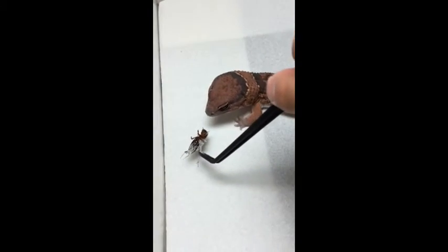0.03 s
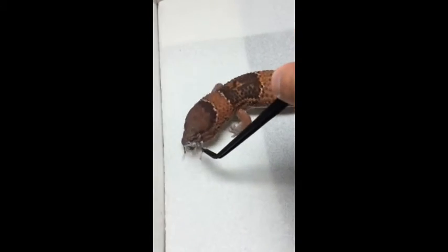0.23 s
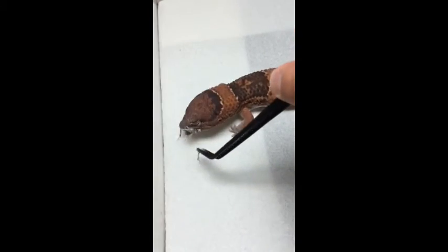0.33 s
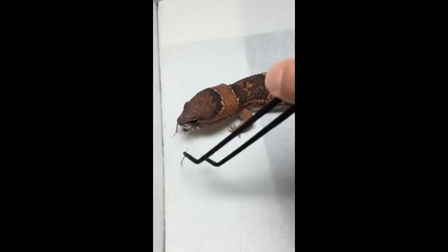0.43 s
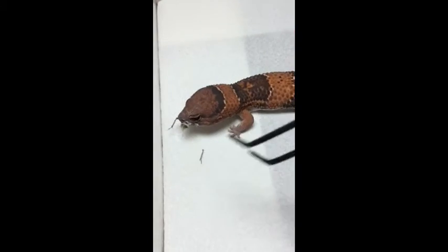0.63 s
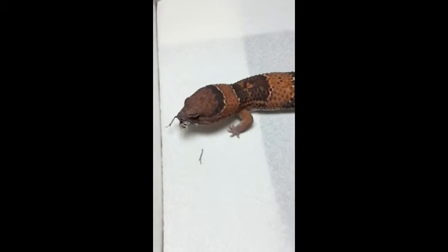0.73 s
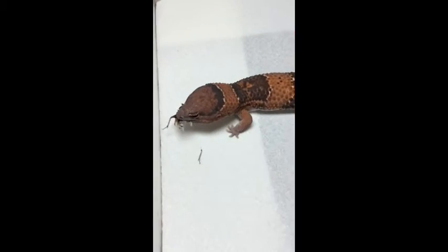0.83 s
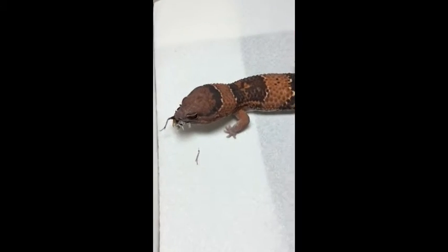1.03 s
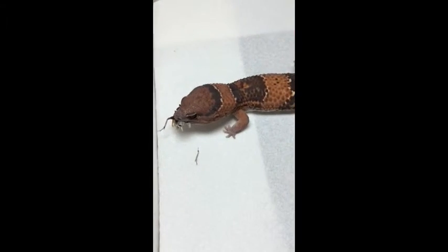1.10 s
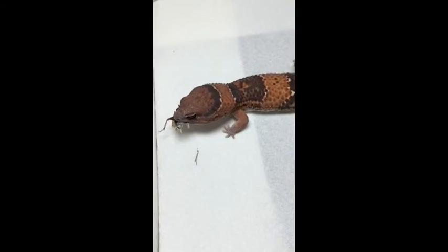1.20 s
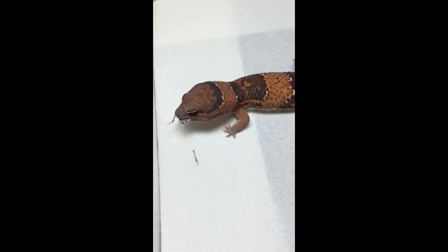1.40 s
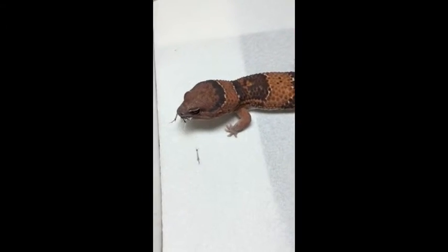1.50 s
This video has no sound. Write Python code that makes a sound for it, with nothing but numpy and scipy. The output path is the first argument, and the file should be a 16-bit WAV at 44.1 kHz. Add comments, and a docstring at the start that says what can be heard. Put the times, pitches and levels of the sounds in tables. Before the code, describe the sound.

A gecko crunches an insect close by. At about 0.2 seconds it lunges with a brief scuff on paper and a soft, hollow thump. Small dry snaps and crinkles of shell follow, with harder bites around 0.65 seconds and from 0.9 to 1.05. The chewing then thins to faint ticks, with one more small crackle near 1.4 seconds. A low ventilation hum fills the quiet room throughout.

```python
"""A ventilation-like hum fills a quiet room. A gecko lunges at an insect held in tweezers: friction over
paper makes a scuff, and the impact of its body excites the damped modes of the enclosure floor.
Then it chews. Each fracture of the shell is a short dry snap that rings two small resonances around
the jaws; hard bites crush the body, and softer crinkling and faint ticks come between them."""
import sys
import numpy as np
from scipy import signal
from scipy.fft import rfft, irfft
from scipy.io import wavfile
from scipy.ndimage import uniform_filter1d

SR = 44100
rng = np.random.default_rng(int(sys.argv[2]) if len(sys.argv) > 2 else 0)


def dump_mix(stems):
    """Bounce the given channels to the path in sys.argv[1] as a 16-bit WAV at rate SR."""
    frames = np.atleast_2d(stems).T  # one column per channel
    limited = np.clip(frames, -1, 1)  # hard clip at full scale
    pcm = np.round(limited * 32767).astype(np.int16)
    wavfile.write(sys.argv[1], SR, pcm)


N = 68355

# Shell fractures. Each row: start in seconds, snap level in dB, snap centre in Hz, splinters in dB
# relative to the snap, high ring level in dB, low ring level in dB, low ring frequency in Hz.
SHELL_CRACKS = [(0.282, -56, 9200, -5, -52, -81, 2450), (0.3248, -65, 8800, 1, -65, -61, 2050),
                (0.477, -54.5, 11600, -17, -76, -80.5, 2240), (0.5039, -65, 12500, -2, -82, -84, 2210),
                (0.516, -64, 11700, -10, -66, -67, 2300), (0.5205, -41, 9800, -26, -62, -60.5, 2120),
                (0.5506, -57.5, 11000, -5, -75, -78, 2400), (0.5523, -54.5, 13300, -3, -83, -69, 1800),
                (0.5641, -61.5, 10400, -10, -84, -65, 1840), (0.573, -62, 11500, 1, -61.5, -60, 2040),
                (0.5794, -59, 11800, -5, -71, -69, 2360), (0.6325, -57.5, 11300, -8, -60, -64.5, 2130),
                (0.6512, -43, 11800, -16, -66, -47.5, 1920), (0.6545, -50, 9100, 4, -47, -55.5, 2240),
                (0.661, -54.5, 10800, -3, -56, -64, 2820), (0.6662, -56, 8700, -6, -54, -53, 2780),
                (0.778, -64, 12700, -10, -92, -80, 2140), (0.7976, -59.5, 10100, -8, -93.5, -73.5, 1800),
                (0.8372, -56, 11600, -2.5, -85, -69, 1770), (0.8669, -52.5, 11400, -4.5, -78, -61, 2260),
                (0.8874, -59.5, 9500, -4.5, -74.5, -72, 2520), (0.8905, -54, 10500, -1, -72, -63.5, 2640),
                (0.9254, -42.5, 11700, 16, -46, -47.5, 2640), (0.9323, -50, 10100, 1, -53, -56, 2560),
                (0.9374, -58, 11300, -4, -62, -58, 2160), (0.966, -50.5, 11000, -6, -52.5, -49, 2572),
                (0.981, -67, 9500, -8, -56, -77, 2580), (0.994, -62, 11400, -5, -61, -67, 2050),
                (1.0038, -41.5, 11300, 6, -56, -52, 2030), (1.0108, -46, 13000, -5, -55, -58, 2020),
                (1.0143, -47, 9000, 1, -45.5, -53, 2160), (1.0253, -58, 11200, 1, -60.5, -67, 2180),
                (1.0317, -58.5, 10300, -1, -52.5, -62.5, 2020), (1.0396, -43, 9900, -6.5, -39, -45.5, 2040),
                (1.0495, -46.5, 9300, -22, -55, -66, 2550), (1.054, -55, 10000, -4, -59, -65, 2030),
                (1.1539, -64, 9200, -8, -72, -70.5, 1830), (1.3044, -59, 11200, 3, -80, -70, 2380),
                (1.4044, -77, 5500, 0.5, -72, -61.5, 2930), (1.4202, -53, 7640, 16, -64, -62.5, 2450)]
# Peaks and dips of every snap. Each row: centre in Hz, width in Hz, gain in dB.
SNAP_BANDS = [(4480, 700, 2.5), (7800, 670, -5.5), (8730, 520, 2.5)]
# Enclosure modes. Each row: frequency in Hz, level in dB relative to the low ring, decay in seconds.
ENCLOSURE_MODES = [(1048, -17.5, 0.0046), (2615, -5, 0.006), (2880, -17, 0.007), (4550, -9, 0.0015)]
# The insect's body giving way. Each row: start in seconds, level in dB, decay in seconds.
HARD_BITES = [(.5725, -54, 0.0042), (.651, -42, 0.0017), (.6545, -40.5, 0.00495), (0.666, -49, 0.0044),
              (.9257, -48, 0.0036), (.9657, -42, 0.0038), (1.0156, -50, 0.0069), (1.0396, -60, 0.0039)]
# Wings and legs crumpling. Each row: start in seconds, length in seconds, level in dB.
CRINKLE_SWELLS = [(0.462, 0.066, -67.5), (.535, 0.072, -67.5), (0.616, 0.072, -60.5), (0.877, 0.034, -57),
                  (0.928, 0.14, -60.5), (1.367, 0.033, -65.5), (1.402, 0.018, -55), (1.408, 0.043, -64)]
# The course of the scuff. Each row: time in seconds, level in dB.
SCUFF_ENVELOPE = [(.14, -99), (.168, -66), (.195, -71), (0.218, -59), (0.224, -40), (0.234, -40),
                  (0.24, -43), (0.257, -33.5), (0.272, -47), (.3, -53), (.32, -62.5), (.365, -66),
                  (.388, -60), (0.429, -82)]
# The gecko landing, then shifting its weight. Each row: start in seconds, level in dB.
FLOOR_BLOWS = [(.249, -40), (0.2547, -34), (0.2589, -25.5), (.306, -49), (.381, -47), (1.276, -50.5)]
# Floor modes. Each row: frequency in Hz, level in dB relative to the blow, decay in seconds.
FLOOR_RESONANCES = [(55, -27.5, 0.01), (103.5, -12, .017), (138, 6, 0.014), (226, -19.5, 0.007),
                    (404, -13.5, 0.018)]
# Knocks of the strike and a bite. Each row: start in seconds, frequency in Hz, level in dB, decay in seconds.
HOLLOW_KNOCKS = [(.223, 437, -41.5, 0.012), (.2325, 1087, -34.5, 0.0052), (0.2536, 455, -30.5, 0.0085),
                 (.254, 733, -41.5, 0.0065), (.263, 1020, -48, 0.011), (.655, 990, -53, 0.013)]
# Fan and mains tones. Each row: frequency in Hz, level in dB.
HUM_LINES = [(100, -59), (200, -67), (316, -68), (416, -69.5), (776, -90.5), (905, -77), (1016, -80.5)]
# Spectra of the four noises. Each row: frequency in Hz, relative spectral density in dB.
CRUSH_SPECTRUM = [(500, -43), (1000, 7), (1400, -12), (1900, 5), (3500, 3.5), (4700, -14), (5500, -22),
                  (9000, -3.5)]
CRINKLE_SPECTRUM = [(1200, -14), (2600, 5), (3700, -7), (5700, -5), (6400, 0.5), (7200, -1.5), (10000, -6),
                    (15000, 0)]
SCUFF_SPECTRUM = [(50, -35), (150, 13), (300, 4), (430, 10.5), (560, -2), (760, 3), (880, -7), (1050, 8),
                  (1250, -1), (1650, -0.5), (2500, 0), (3500, -4), (6300, -2.5), (11000, -3), (15000, -3)]
AIR_SPECTRUM = [(20, -32), (35, -7), (52, -3.5), (72, -11), (100, 0.5), (140, -0.5), (200, -3), (260, -7),
                (330, -5), (430, -9.5), (520, -17), (750, -16.5), (950, -20), (1300, -23.5), (1750, -20),
                (2300, -32.5), (3300, -36.5), (6500, -38.5), (9000, -42), (15000, -41.5)]


def cracks():
    """Impulse excitation: each snap rings two resonances around the jaws and, faintly, the enclosure."""
    out, t = np.zeros(N), np.arange(SR // 20) / SR
    walls = sum(at_level(mode(t, hz, decay, rise_s=.0005), db) for hz, db, decay in ENCLOSURE_MODES)
    for start, snap_db, snap_hz, splinter_db, high_db, low_db, low_hz in SHELL_CRACKS:
        fracture = at_level(snap(t, snap_hz, splinter_db), snap_db)
        high_hz = 6350 * (1 + .012 * rng.standard_normal())
        high = at_level(jaw_ring(t, high_hz, width_hz=900), high_db)
        low = at_level(jaw_ring(t, low_hz, width_hz=970), low_db)
        add(out, start, fracture + high + low + undb(low_db) * walls)
    return out


def snap(t, centre_hz, splinter_db):
    """Brittle fracture releases stress as a bright burst, trailed by splinters and near echoes."""
    rise_s, snap_s, splinter_s, echo_s = .00012, .0006, .0017, .005
    splinters = undb(splinter_db) * np.exp(-t / splinter_s)
    echoes = undb(-21) * np.exp(-t / echo_s)
    envelope = (np.exp(-t / snap_s) + splinters + echoes) * (1 - np.exp(-t / rise_s))
    burst = band(rng.standard_normal(len(t)) * envelope, centre_hz, width_hz=3700)
    burst = signal.sosfilt(signal.butter(4, 2930, "high", fs=SR, output="sos"), burst)
    for hz, width_hz, db in SNAP_BANDS:
        burst = burst + (undb(db) - 1) * band(burst, hz, width_hz)
    return burst


def jaw_ring(t, hz, width_hz, decay_s=.002, rise_s=.0005, roughness=.6):
    """A heavily damped resonance: a sine, roughened by narrow-band noise, dies within milliseconds."""
    noise = band(rng.standard_normal(len(t)), hz, width_hz)
    tone = np.sin(2 * np.pi * hz * t) + roughness * unit(band(noise, hz, width_hz))
    return tone * np.exp(-t / decay_s) * (1 - np.exp(-t / rise_s))


def crush(t):
    """Collapse under load: dense fractures merge into fuller, lower bursts that decay exponentially."""
    out = np.zeros(N)
    for start, db, decay in HARD_BITES:
        fractures = colour(grains(per_s=8000, spread_db=2), CRUSH_SPECTRUM)
        add(out, start, undb(db) * np.exp(-t / decay) * fractures)
    return out


def crinkles(t):
    """Crumpling: tiny fractures add up to a soft swell each time the jaws squeeze."""
    swell = np.zeros(N)
    for start, length, db in CRINKLE_SWELLS:
        progress = np.clip((t - start) / length, 0, 1)
        swell += undb(db) * np.sqrt(np.abs(np.sin(np.pi * progress)))
    return swell * colour(grains(per_s=2600, spread_db=3.5), CRINKLE_SPECTRUM)


def scuff(t):
    """Sliding friction: skin and insect catch on the paper in a dense train of clicks."""
    times, db = np.array(SCUFF_ENVELOPE).T
    envelope = undb(np.interp(t, times, db, left=-np.inf, right=-np.inf))
    return envelope * colour(grains(per_s=4560, spread_db=2.5), SCUFF_SPECTRUM)


def impacts(t, rise_s=.001):
    """Modal vibration: soft blows ring the low floor modes; each hard contact rings one hollow mode."""
    out = np.zeros(N)
    floor = sum(undb(db) * mode(t, hz, decay, rise_s) for hz, db, decay in FLOOR_RESONANCES)
    for start, db in FLOOR_BLOWS:
        add(out, start, undb(db) * floor)
    for start, hz, db, decay in HOLLOW_KNOCKS:
        add(out, start, undb(db) * mode(t, hz, decay, rise_s))
    return out


def ticks(t, from_s=.35, decay_s=.0018):
    """Shell shifting in the mouth gives sparse random impulses, each with a short noisy decay."""
    tail = rng.standard_normal(SR // 50) * np.exp(-t[:SR // 50] / decay_s)
    clicks = signal.fftconvolve(grains(per_s=69, spread_db=0), tail)[:N]
    return undb(-76.5) * (t > from_s) * colour(clicks, CRINKLE_SPECTRUM)


def room(t, waver_db=1, drift_rad=.57):
    """Superposition: a low broadband rush of air lies under wavering fan and mains tones."""
    out = undb(-54.5) * colour(rng.standard_normal(N), AIR_SPECTRUM)
    for hz, db in HUM_LINES:
        waver = undb(waver_db * walk(per_s=11.7))
        phase = 2 * np.pi * hz * t + drift_rad * walk(per_s=7.28)
        out += undb(db) * unit(waver * np.sin(phase))
    return out


def mode(t, hz, decay_s, rise_s):
    """A struck mode vibrates as an exponentially damped sine."""
    return np.sin(2 * np.pi * hz * t) * np.exp(-t / decay_s) * (1 - np.exp(-t / rise_s))


def grains(per_s, spread_db):
    """Shot noise: independent impulses of random sign, with normally distributed levels."""
    chance, size = rng.random(N), rng.standard_normal(N)
    return (chance < per_s / SR) * rng.choice([-1, 1], N) * undb(spread_db * size)


def walk(per_s):
    """Averaging random steps twice gives a smooth drift of rms 1."""
    hold = int(SR / per_s)
    steps = np.repeat(rng.standard_normal(N // hold + 1), hold)
    return unit(uniform_filter1d(uniform_filter1d(steps, hold), hold)[:N])


def colour(x, spectrum):
    """Spectral shaping by (Hz, dB) points joined over log frequency; the result has rms 1."""
    hz, db = np.array(spectrum).T
    bins_hz = np.fft.rfftfreq(len(x), 1 / SR)
    gain = undb(np.interp(np.log(bins_hz + 1), np.log(hz), db))
    return unit(irfft(rfft(x) * gain, len(x)))


def band(x, hz, width_hz):
    """A two-pole resonance passes the band around its centre."""
    return signal.lfilter(*signal.iirpeak(hz, hz / width_hz, fs=SR), x)


def at_level(x, db, window_s=.005):
    """Equal energy: a transient is scaled to match a steady level of db lasting window_s."""
    return x * undb(db) / np.sqrt(np.sum(x ** 2) / (window_s * SR))


def undb(db):
    """Amplitude grows tenfold per 20 dB."""
    return 10 ** (np.asarray(db) / 20)


def unit(x):
    """Normalisation to rms 1."""
    return x / np.sqrt(np.mean(x ** 2))


def add(out, start_s, x):
    """A sound adds linearly to the mix from its start time."""
    i = int(start_s * SR)
    out[i:i + len(x)] += x[:len(out) - i]


def scene():
    """The pressures of room, lunge, landing and chewing sum in one channel."""
    t = np.arange(N) / SR
    return (room(t) + scuff(t) + impacts(t) + crinkles(t) + crush(t) + cracks() + ticks(t))[None]


def record(dry):
    """Band limiting removes the deepest bass and the highest treble."""
    low_cut_hz, top_hz = 36, 15400
    thinned = signal.sosfilt(signal.butter(3, low_cut_hz, "high", fs=SR, output="sos"), dry)
    return signal.sosfilt(signal.ellip(10, .2, 80, top_hz, fs=SR, output="sos"), thinned)


dry = scene()
out = record(dry)
dump_mix(out)
```